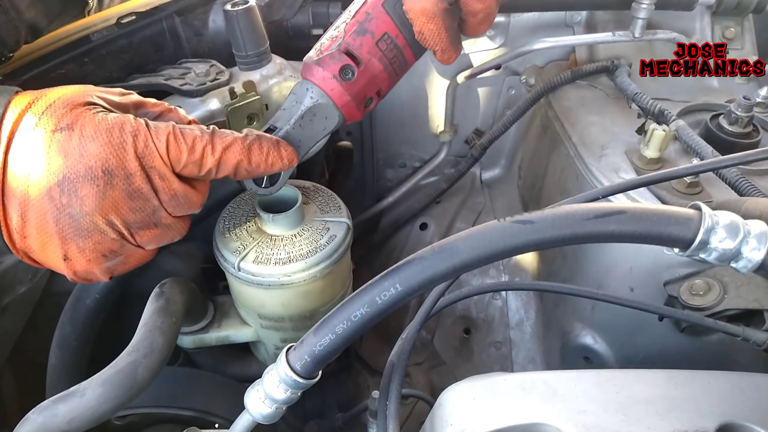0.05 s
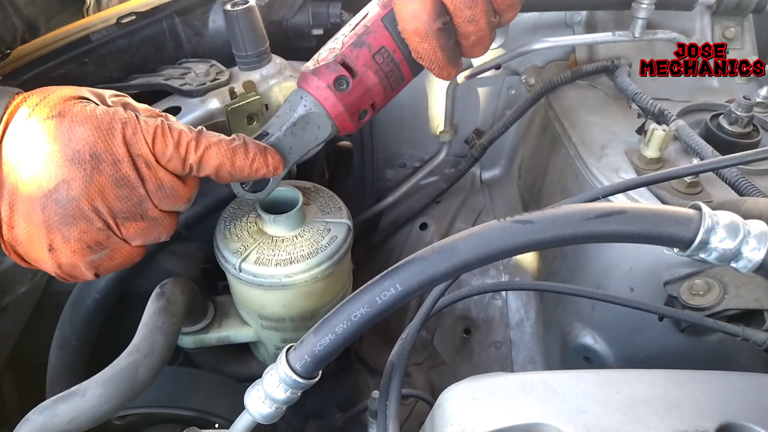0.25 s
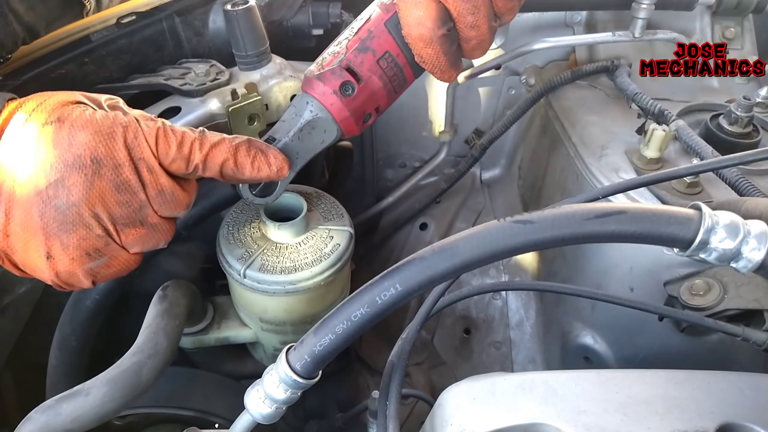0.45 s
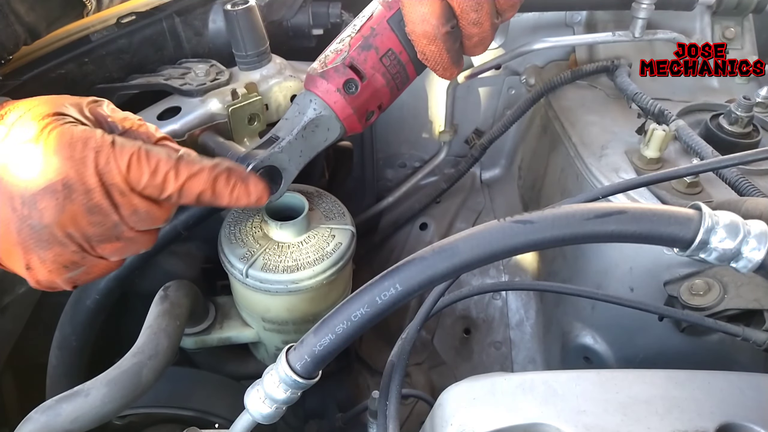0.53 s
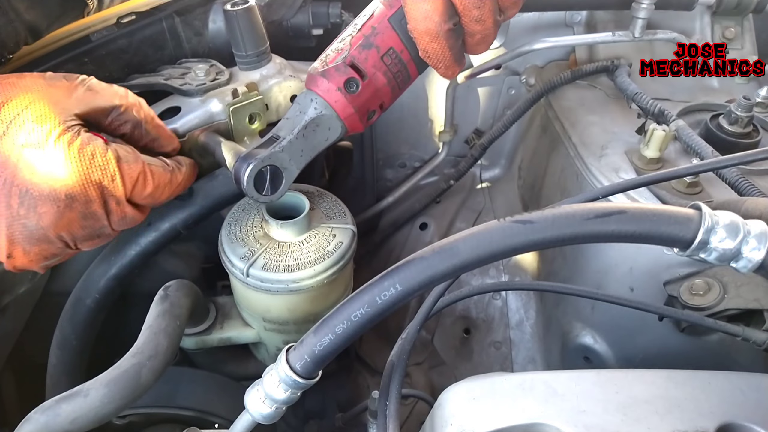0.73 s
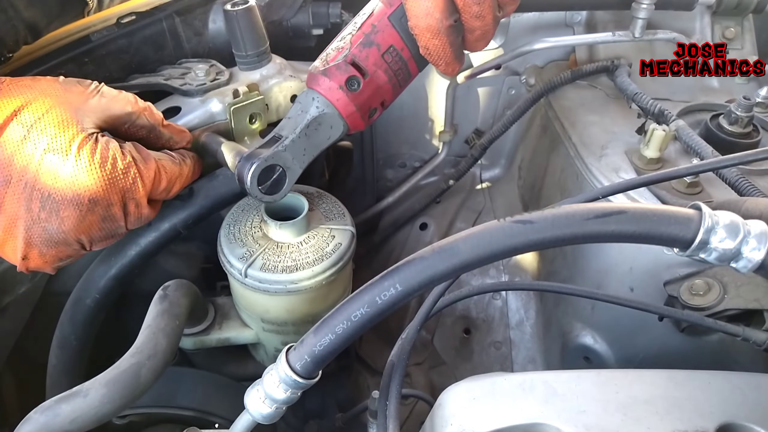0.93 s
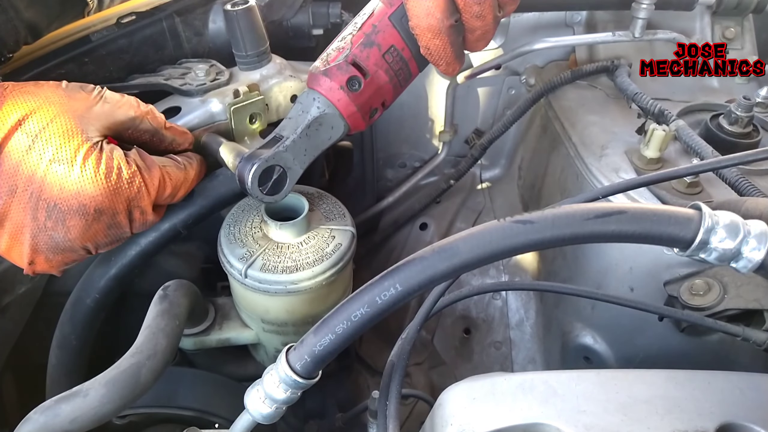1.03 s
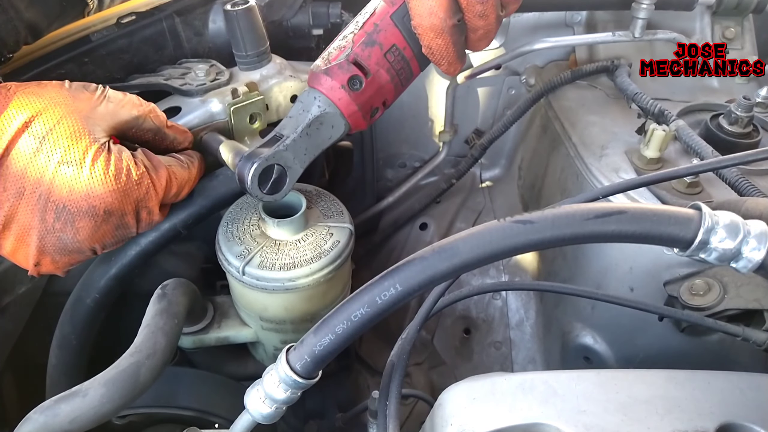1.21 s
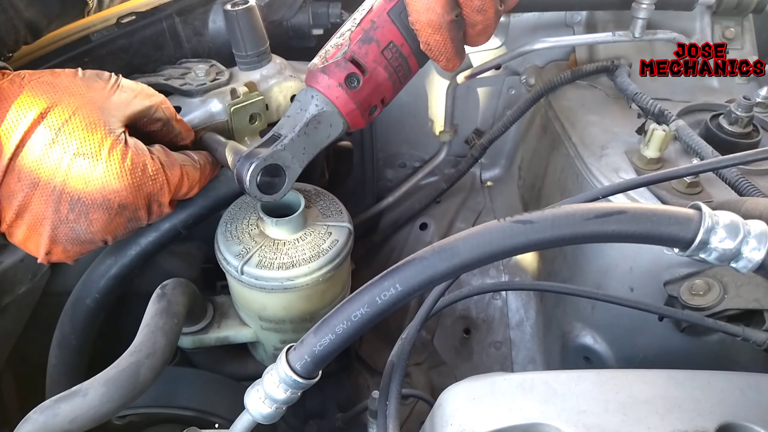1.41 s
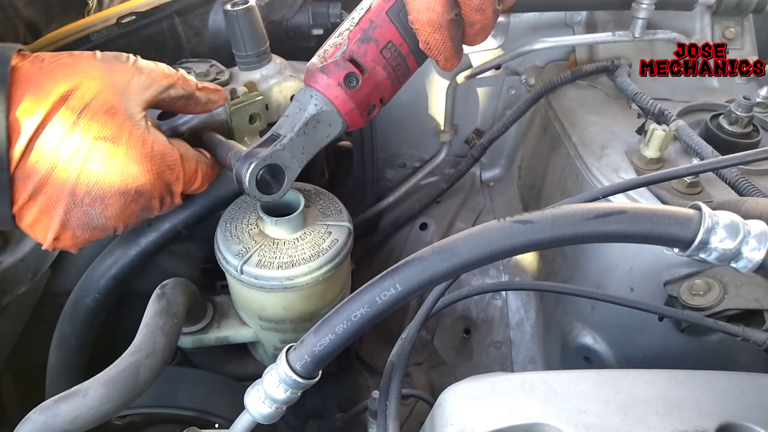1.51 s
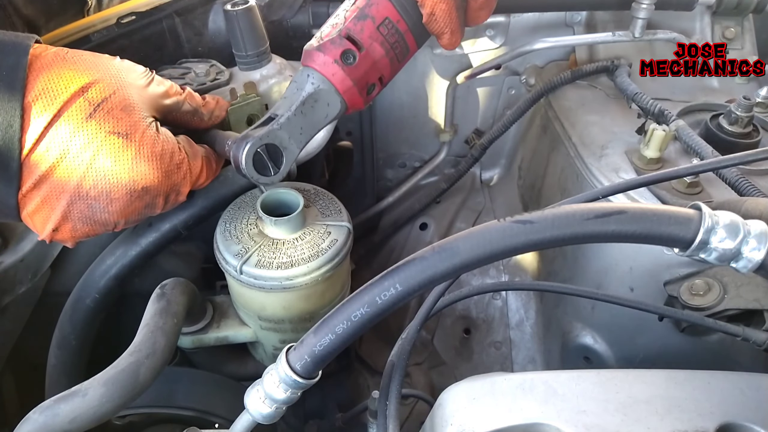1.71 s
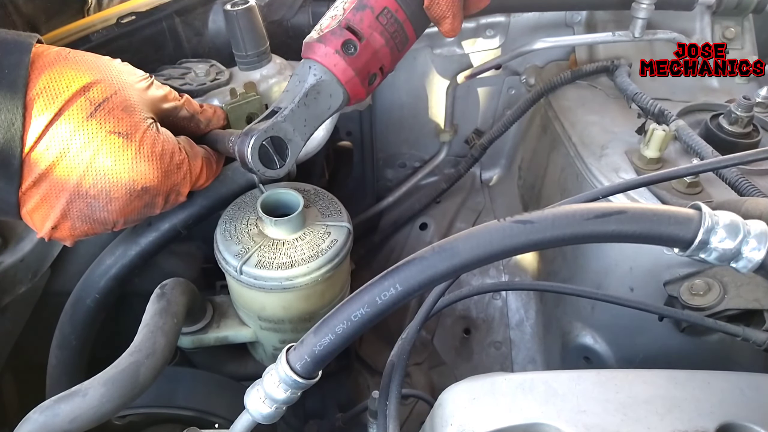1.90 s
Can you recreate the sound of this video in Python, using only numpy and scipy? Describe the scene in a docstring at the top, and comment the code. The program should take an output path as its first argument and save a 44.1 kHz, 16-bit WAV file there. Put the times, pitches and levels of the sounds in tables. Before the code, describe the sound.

A cordless ratchet whirs in one harsh, rattling burst after a few clicks, then stops dead.

```python
"""First a fading knock and a dull bump, then trigger clicks: a cordless ratchet in a car engine bay.
The motor spins up, backs out a bolt in one burst and stops dead; a metal part rings on.
Random tooth hits ring the housing for rattle, growl and whine; sines locked to the shaft hum.
Knocks are fading noise and struck tones. Sparse echoes make the bay; shaped noise is the outdoor floor."""
import sys
import numpy as np
from scipy import signal
from scipy.io import wavfile
from scipy.ndimage import uniform_filter1d

SR = 44100
rng = np.random.default_rng(int(sys.argv[2]) if len(sys.argv) > 2 else 0)


def how_loud(loudness_db):
    """Turn decibels into a plain amplitude multiplier (0 dB gives 1, 20 dB gives 10)."""
    steps = np.asarray(loudness_db, float) / 20
    return 10 ** steps


def transcribe(signal):
    """Save signal, clipped to [-1, 1], as a 16-bit WAV file at the path in sys.argv[1]."""
    frames = np.atleast_2d(signal).T
    limited = np.clip(frames, -1, 1)
    pcm = np.round(limited * 32767).astype(np.int16)
    wavfile.write(sys.argv[1], SR, pcm)


N = 85995


def evened(x):
    """Scales a sound to an average (rms) level of 1."""
    return x / np.sqrt(np.mean(x ** 2) + 1e-20)


def read(points, hz):
    """Reads a table between its points, on a logarithmic pitch axis."""
    table_hz, value = np.transpose(points)
    return np.interp(np.log(hz + 1), np.log(table_hz + 1), value)


def colour(x, points):
    """Filters a sound to the given spectrum, with no sound before its cause (minimum phase)."""
    db = np.maximum(read(points, abs(np.fft.fftfreq(4096, 1 / SR))), -110)
    log_gain = db * np.log(10) / 20
    taps = np.fft.ifft(np.exp(signal.hilbert(log_gain).conj())).real[:2048]
    return signal.oaconvolve(x, taps)[:len(x)]


def resonate(x, hz, width):
    """Rings like one resonance, with a gain of about 1 at its own pitch."""
    r = np.exp(-np.pi * width / SR)
    return 2 * signal.lfilter([1 - r], [1, -r * np.exp(2j * np.pi * hz / SR)], x).real


def drift(hz):
    """Random wandering of rms 1, no faster than about hz."""
    low_pass = signal.butter(2, hz, fs=SR, output="sos")
    settled = signal.sosfilt(low_pass, rng.standard_normal(2 * N))[N:]
    return evened(settled)


def patchy(x, db):
    """Makes random patches of time and pitch swell and sink."""
    z = signal.stft(x, nperseg=512, noverlap=384)[2]
    across_time = uniform_filter1d(rng.standard_normal(z.shape), 20, 1)
    patches = evened(uniform_filter1d(across_time, 4, 0))
    return signal.istft(z * how_loud(db * patches), nperseg=512, noverlap=384)[1][:len(x)]


def add(mix, s, sound):
    """Mixes a sound in at a time in seconds."""
    part = mix[round(s * SR):][:len(sound)]
    part += sound[:len(part)]


def outdoor_floor():
    """The low outdoor noise: random noise shaped to a dull spectrum, slowly swelling."""
    # spectrum shape: pitch_hz [Hz], density_db [dB per Hz, relative]
    floor_shape = [(30, -30), (60, -4), (145, 3), (400, -4), (800, -11), (1500, -16), (2500, -19),
                   (3400, -28), (8000, -40)]
    # slow swell: time_s [s], level_db [dB]
    floor_swell = [(0, -57), (1.9, -52)]
    level_db = np.interp(np.arange(N) / SR, *np.transpose(floor_swell))
    return how_loud(level_db) * evened(colour(rng.standard_normal(N), floor_shape))


def bay(x):
    """Sparse reflections of the engine bay, each band dying at its own speed."""
    # echo decay: pitch_hz [Hz], time to fall 60 dB t60_s [s]
    bay_decay = [(150, 0.39), (300, 0.15), (500, 0.48), (1500, 0.26), (2500, 0.24), (3500, 0.13),
                 (7000, 0.065)]
    taps = np.zeros(SR // 2)
    at = np.arange(100, len(taps) - 20, 20)
    taps[at + rng.integers(0, 20, len(at))] = rng.choice([-1., 1.], len(at))
    hz, t, z = signal.stft(taps, SR, nperseg=256)
    fade = how_loud(-60 * t / read(bay_decay, hz)[:, None])
    tail = signal.istft(z * fade, SR, nperseg=256)[1]
    return signal.oaconvolve(x, tail / np.linalg.norm(tail))[:N]


def ring():
    """One slowly dying tone of a metal part, heard once the motor stops."""
    ring_hz, ring_db, t60_s, full_at_s, rise_s = 2893, -59.5, 1.15, 1.78, 0.029
    t = np.arange(N) / SR - full_at_s
    level_db = ring_db - 60 * np.maximum(t, 0) / t60_s + 3 * drift(hz=60)
    rise = np.clip(1 + t / rise_s, 0, 1)
    return rise * how_loud(level_db) * np.sin(2 * np.pi * ring_hz * t)


def fading_knock(t):
    """An earlier knock dying away: shaped noise that fades evenly in dB."""
    # spectrum shape: pitch_hz [Hz], density_db [dB per Hz, relative]
    fading_shape = [(47, -46), (80, -9), (823, -10), (979, -19.5), (1620, -22.5), (1890, -21.5),
                    (2380, -20), (4660, -39.5), (8000, -51.5), (10400, -84), (17600, -120)]
    level_db, t60_s = -32, .13
    return evened(colour(rng.standard_normal(len(t)), fading_shape)) * how_loud(level_db - 60 * t / t60_s)


def thud(t, db, rise_s):
    """The low tones (modes) of the tool body, struck softly and slightly off pitch each time."""
    # body modes: pitch_hz [Hz, before the random shift], level_db [dB, relative]
    body_modes = [(92, -18.5), (176, -6), (260, -1.5), (350, -7), (445, -0.5), (700, -14), (830, -20.5)]
    t60_s = .11
    modes = 0
    for hz, mode_db in body_modes:
        modes = modes + how_loud(mode_db) * np.sin(2 * np.pi * hz * rng.uniform(0.968, 1.04) * t)
    return modes * np.minimum(t / rise_s, 1) * how_loud(db - 60 * np.maximum(t - rise_s, 0) / t60_s)


def bumps(t):
    """Dull bumps of the tool against the bay, each a thud alone."""
    # bumps: start_s [s], thud_db [dB, relative], rise_s [s]
    bump_list = [(.002, -37, 0.0044), (0.135, -30, 0.0024), (0.23, -10.5, 0.0093), (0.244, -14, 0.0061),
                 (1.931, -41.5, 0.019)]
    out = np.zeros(N)
    for s, thud_db, rise_s in bump_list:
        add(out, s, thud(t, thud_db, rise_s))
    return out


def knocks(t):
    """Trigger, socket and pawl: a noise click, a bright ringing tick and a thud, all fading."""
    # knocks: start_s [s], click_db [dB], tick_db [dB], thud_db [dB, relative]
    knock_list = [(.104, -38, -55.5, -32), (.143, -42, -71, -39.5), (0.1574, -28, -59, -27),
                  (0.1907, -28, -56, -36.5), (.206, -18, -50.5, -14), (1.7778, -57, -65, -33),
                  (1.8235, -50, -72.5, -46.5)]
    # click spectrum shape: pitch_hz [Hz], density_db [dB per Hz, relative]
    click_shape = [(530, -17.5), (800, 3.5), (1200, -5.5), (1600, 0.5), (2500, -2.5), (3910, -13.5),
                   (4490, -29.5), (8300, -41.5), (18300, -120)]
    click_t60_s, tick_t60_s, thud_rise_s = 0.073, .07, .0015
    tick_hz, tick_width_hz = 6300, 3000
    out = np.zeros(N)
    for s, click_db, tick_db, thud_db in knock_list:
        click = evened(colour(rng.standard_normal(len(t)), click_shape))
        click = click * how_loud(click_db - 60 * t / click_t60_s)
        tick = resonate(rng.standard_normal(len(t)), tick_hz, tick_width_hz)
        tick = evened(resonate(tick, tick_hz, tick_width_hz)) * how_loud(tick_db - 60 * t / tick_t60_s)
        add(out, s, click + tick + thud(t, thud_db, thud_rise_s))
    return out


def shaft_turns(t):
    """Counts the motor shaft's turns by adding up its slightly unsteady speed."""
    # shaft speed: time_s [s], speed_hz [turns per second, before the jitter]
    shaft_speed = [(.22, 90), (.33, 113), (.43, 128), (.52, 130.5), (.62, 134.5), (.95, 133), (1.08, 134.4),
                   (1.35, 133.6), (1.65, 131), (1.75, 129)]
    jitter = .02  # rms share of the speed
    speed_hz = np.interp(t, *np.transpose(shaft_speed)) * (1 + jitter * drift(hz=26.3))
    return np.cumsum(speed_hz) / SR


def tooth_hits(turns):
    """Random gear-tooth impacts of uneven strength, bunched a little once a turn."""
    teeth_per_s, spread_db, turn_depth = 22000, 1.0, 0.12
    strength = how_loud(spread_db * np.minimum(rng.exponential(1, N), 4)) * rng.standard_normal(N)
    hit = rng.random(N) < teeth_per_s / SR
    bunch = 1 + turn_depth * np.cos(2 * np.pi * turns)
    return evened(strength * hit * bunch)


def housing(teeth):
    """The tooth hits plus the housing resonances they ring, made patchy."""
    # resonances: pitch_hz [Hz], width_hz [Hz], level_db [dB, relative to the hits]
    housing_modes = [(252, 40, -1), (329.5, 27, 2.5), (435, 27, 0), (668, 69, -6.5), (776, 25, 7),
                     (936, 33, -3), (1224, 14, -19.5), (2220, 40, -20.5), (2823, 80, -0.5),
                     (3200, 470, -12), (3700, 740, -4), (5270, 770, -4.5)]
    rung = sum(how_loud(db) * resonate(teeth, hz, width) for hz, width, db in housing_modes)
    return patchy(teeth + rung, db=0.5)


def shaft_hum(turns):
    """The unbalance hums at multiples (orders) of the shaft speed, each wavering in level."""
    # orders: multiple [times shaft speed], level_db [dB above the growl, before the waver]
    shaft_orders = [(1, -27.5), (2, -19.5), (4, -13.5), (5, -15.5), (7, -19), (9, -28.5)]
    waver_db, waver_hz = 5, 20
    hum = 0
    for multiple, db in shaft_orders:
        tone = np.sin(2 * np.pi * (multiple * turns + rng.random()))
        hum = hum + how_loud(db + waver_db * drift(waver_hz)) * tone
    return hum


def motor_on(t, first_s, last_s):
    """A quick ramp up at the start and a quick dying away at the stop."""
    start_s, stop_s = 0.0053, 0.0071
    return np.clip((t - first_s) / start_s, 0, 1) * np.exp(-np.maximum(t - last_s, 0) / stop_s)


def burst(t, teeth, turns):
    """The rung housing as a bright rattle and a low body growl, with the shaft hum in the growl."""
    # burst: time_s [s], rattle_db [dB], growl_db [dB, sets growl and hum together]
    burst_levels = [(0.16, -62, -54), (0.186, -46, -21.5), (0.191, -40, -30), (0.227, -27.5, -15.5),
                    (0.232, -15.5, -13), (0.256, -19, -17), (0.274, -10.5, -11), (0.322, -16.5, -12.5),
                    (0.346, -12.5, -13.5), (0.486, -14.5, -13.5), (0.536, -15.5, -17), (0.642, -13, -13),
                    (0.682, -15.5, -18.5), (1.084, -14, -15), (1.292, -15.5, -18.5), (1.462, -14, -19),
                    (1.474, -16.5, -21.5), (1.634, -15, -20), (1.7, -16.5, -20), (1.71, -22.5, -27.5),
                    (1.724, -14.5, -18.5), (1.731, -21.5, -28.5), (1.74, -20, -16.5)]
    # rattle spectrum shape: pitch_hz [Hz], density_db [dB per Hz, relative]
    rattle_shape = [(530, -20.5), (900, -6), (1030, -4.5), (1210, 3), (1460, -9.5), (1690, 2), (1860, -2.5),
                    (2180, 1), (2550, -4.5), (2880, 0), (5170, -1), (7420, -6), (8300, -8), (10800, -60.5),
                    (18300, -120)]
    # growl spectrum shape: pitch_hz [Hz], density_db [dB per Hz, relative]
    growl_shape = [(24, -42), (70, -30), (130, -14), (210, -13.5), (253, -6.5), (304, -7), (398, 0.5),
                   (566, -2), (680, 2.5), (1450, -7), (2200, -40.5), (2860, -47.5), (4840, -120)]
    at, rattle_db, growl_db = np.transpose(burst_levels)
    rung = housing(teeth)
    rattle = evened(colour(rung, rattle_shape)) * how_loud(np.interp(t, at, rattle_db))
    growl = 0.78 * evened(colour(rung, growl_shape)) + shaft_hum(turns)
    growl = growl * how_loud(np.interp(t, at, growl_db))
    return (rattle + growl) * motor_on(t, at[0], at[-1])


def throb(t, teeth, turns):
    """The third shaft order and a housing whine rung by the teeth, both throbbing with the load."""
    # throb: time_s [s], third_order_db [dB, before its gain], whine_db [dB, before its gain]
    throb_levels = [(0.22, -43.5, -26.5), (0.248, -18, -20.5), (0.274, -25, -17), (0.316, -23, -43),
                    (0.372, -38.5, -56), (0.44, -36, -49.5), (0.479, -19.5, -55), (0.572, -44, -22),
                    (0.626, -28, -51), (0.648, -22.5, -17.5), (0.702, -41.5, -16.5), (0.741, -21.5, -28),
                    (0.823, -46.5, -29), (0.848, -30, -15), (0.876, -20.5, -20), (0.91, -44, -9),
                    (0.95, -26, -19.5), (0.978, -25.5, -23), (1.018, -33, -20), (1.068, -20, -37),
                    (1.102, -33.5, -26), (1.14, -20, -41), (1.182, -30.5, -27), (1.212, -20.5, -36.5),
                    (1.288, -34, -36.5), (1.34, -23, -36.5), (1.378, -45, -25), (1.416, -24, -41),
                    (1.454, -31.5, -40), (1.608, -36.5, -47.5), (1.666, -33.5, -30.5), (1.738, -32.5, -21)]
    third_gain_db, whine_gain_db = 1.5, -8.5
    whine_hz, whine_width_hz = 1668, 90
    at, third_db, whine_db = np.transpose(throb_levels)
    third = np.sqrt(2) * np.sin(3 * 2 * np.pi * turns)  # rms 1 when steady
    third = third * how_loud(third_gain_db + np.interp(t, at, third_db))
    whine = resonate(teeth, whine_hz, whine_width_hz)
    whine = evened(resonate(whine, whine_hz, 2 * whine_width_hz))
    whine = whine * how_loud(whine_gain_db + np.interp(t, at, whine_db))
    return (third + whine) * motor_on(t, at[0], at[-1])


def ratchet():
    """The running tool: one shaft and one train of tooth hits drive all its sounds."""
    t = np.arange(N) / SR
    turns = shaft_turns(t)
    teeth = tooth_hits(turns)
    return burst(t, teeth, turns) + throb(t, teeth, turns)


def scene():
    """Tool, knocks and bumps with their bay echoes, the ringing part and the outdoor floor."""
    bay_db = -19
    t = np.arange(8000) / SR  # time within one knock
    near = ratchet() + knocks(t) + bumps(t)
    add(near, 0, fading_knock(t))
    return (near + how_loud(bay_db) * bay(near) + ring() + outdoor_floor())[None]


def band_limit(x):
    """A steep low-pass at the top of the band."""
    return signal.sosfilt(signal.butter(12, 8590, fs=SR, output="sos"), x)


def record(dry):
    """The input rounds off the tallest peaks, then the microphone limits the band."""
    # microphone band: pitch_hz [Hz], gain_db [dB]
    mic_band = [(20, -30), (90, -3.5), (7500, -0.5), (8000, -12.5), (8400, -25), (8650, -45), (8800, -88)]
    ceiling = .95  # peaks bend towards this height
    rounded = dry[0] / (1 + (dry[0] / ceiling) ** 4) ** .25
    mix = colour(rounded, mic_band)[None]
    return band_limit(mix)


dry = scene()
out = record(dry)
transcribe(out)
```